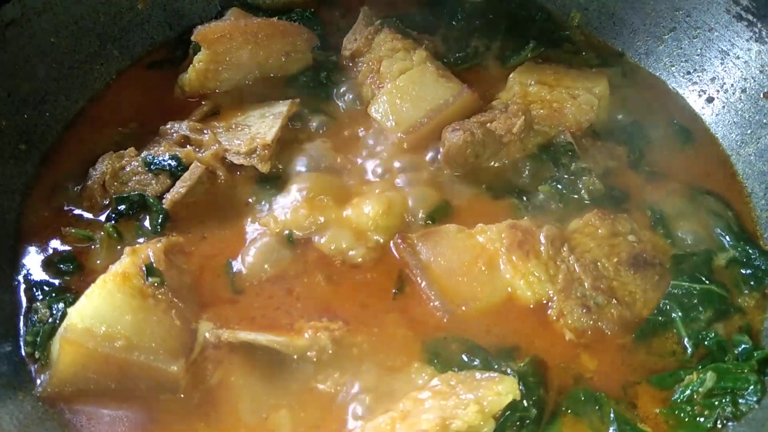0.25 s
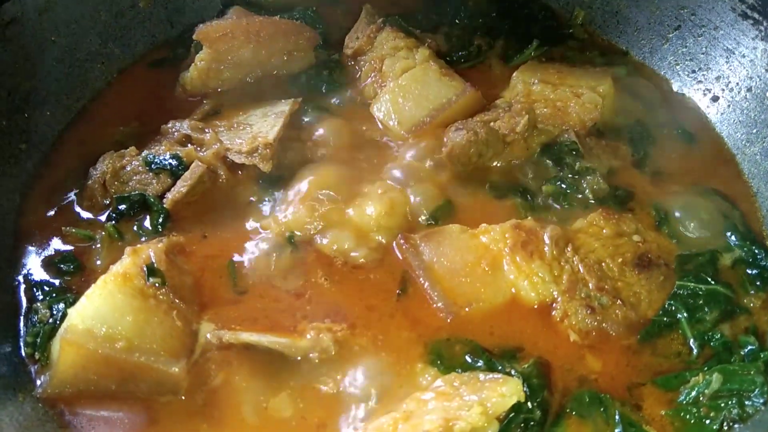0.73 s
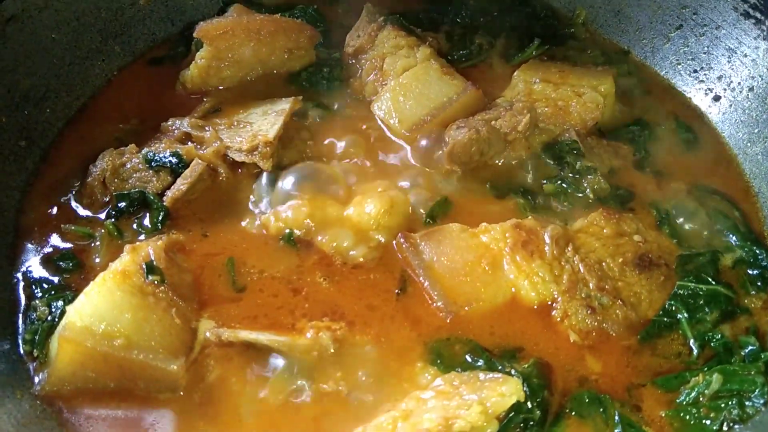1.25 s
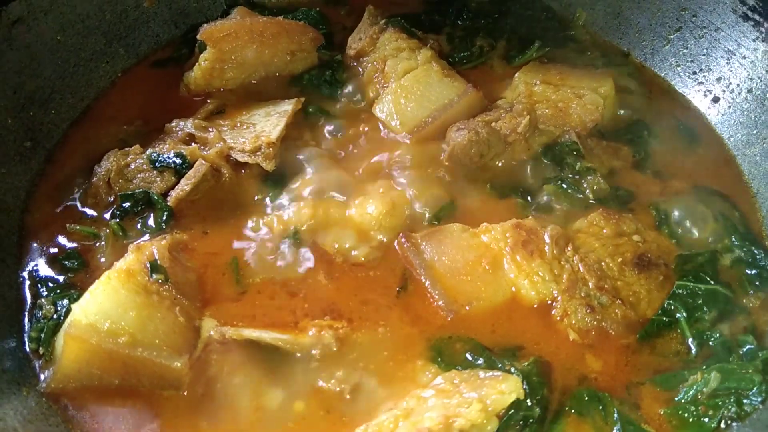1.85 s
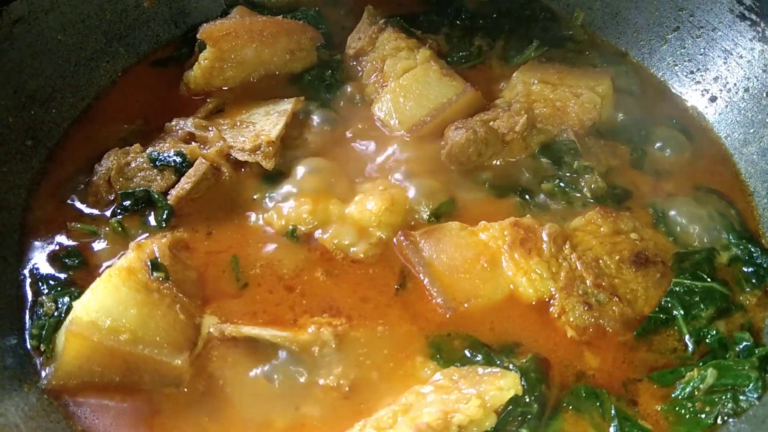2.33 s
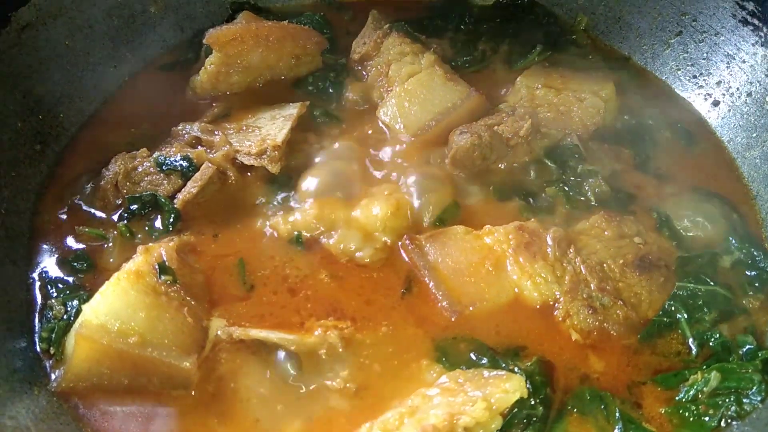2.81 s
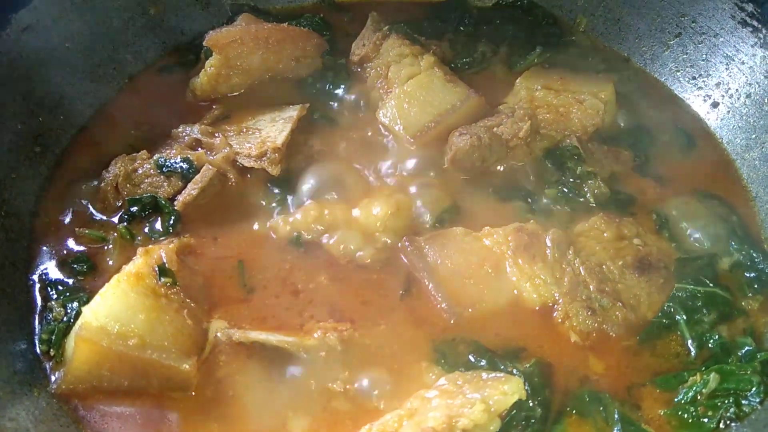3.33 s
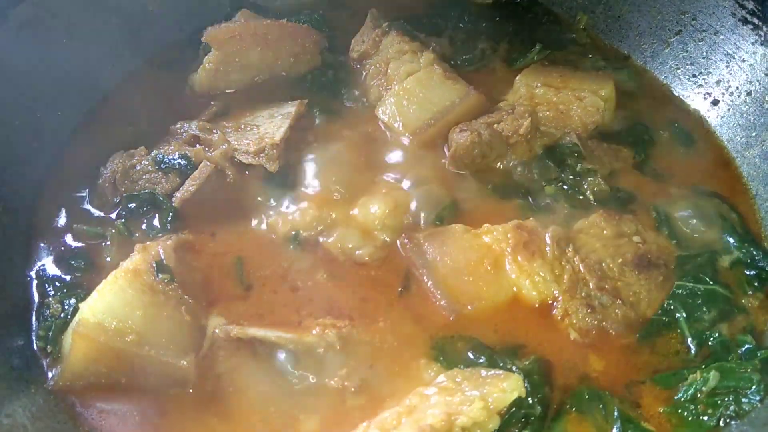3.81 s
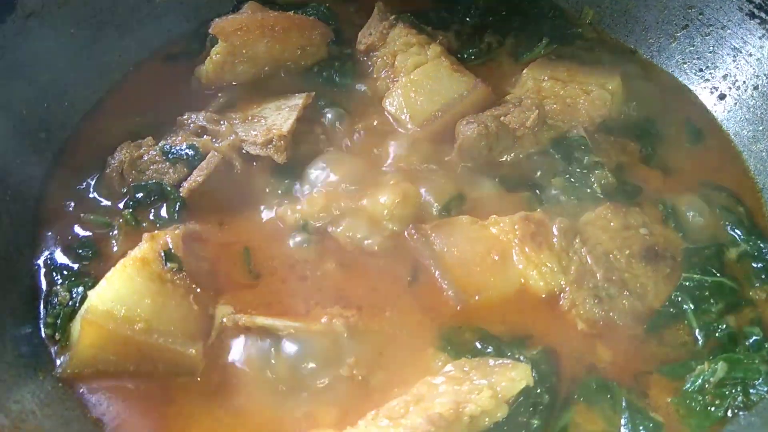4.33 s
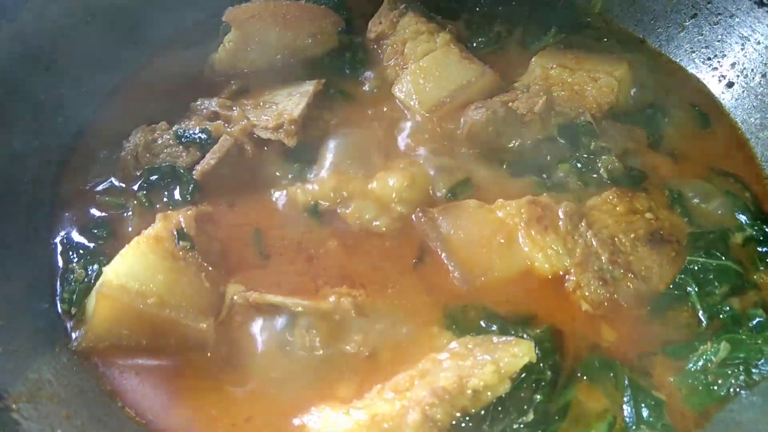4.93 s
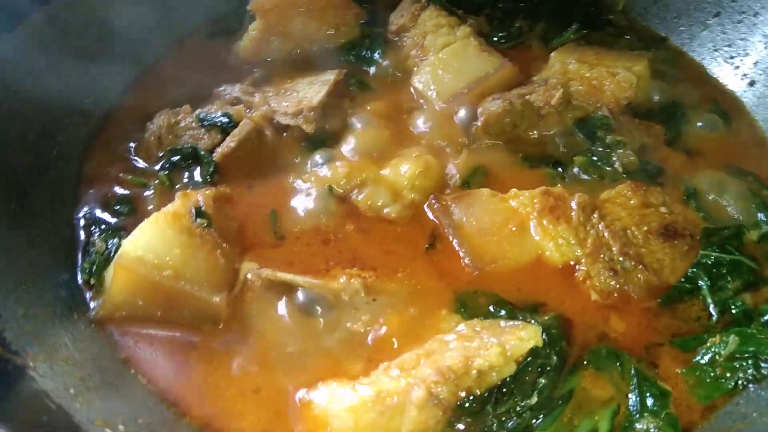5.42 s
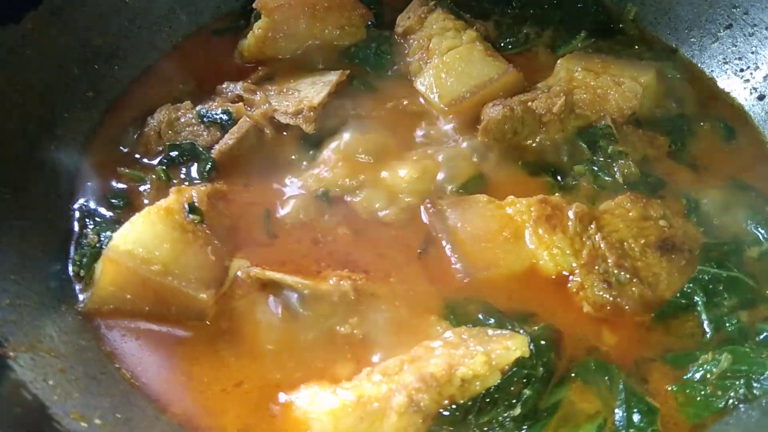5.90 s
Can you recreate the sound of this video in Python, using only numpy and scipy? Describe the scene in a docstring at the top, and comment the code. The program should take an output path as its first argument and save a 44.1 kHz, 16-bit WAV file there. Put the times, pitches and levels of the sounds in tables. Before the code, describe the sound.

A thick curry boils for about six seconds in a steel wok, heard close above it in a small kitchen. It starts already bubbling, with crisp fat snaps and a soft low thump near 0.1 s. Short, wet, rising plops come irregularly over gurgle, froth and fine fizz. Sizzle swells around 1.2 s with a hoarse puff of steam; bright bubbles stand out near 2.0 and 3.0 s, and thin steam wheezes slide by between 2.3 and 3.4 s. Fat spits thicken from 3.4 s, dull thuds stir at 3.6-3.8 s, and the sharpest snap lands near 4.15 s. The bed thins around 4.9 s, though bright spits cut through at 4.95 and 5.3 s. Bubbles crowd again near 5.5 s, with another thud, and wheezes, pops and a low thump close it around 6 s. The metal rings briefly; faint air noise, thin hiss and hum persist.

```python
"""Curry boiling in a wok

A thick curry boils in a steel wok, heard from just above it in a small kitchen. Bubbles burst with short
plops made of damped, rising sines; fat spits in sharp, high rings with wide-band clicks. Crowds of small
rings make the gurgle, froth and sizzle of the boil. Steam wheezes between the pieces of meat as a sliding
whistle in filtered noise, and now and then a big pocket of steam thuds as two low rings.
The wok and the walls ring on a little over fizz, a thin hiss, air noise and a faint mains hum."""
import sys
import numpy as np
from scipy import signal
from scipy.fft import rfft, irfft
from scipy.io import wavfile
from scipy.ndimage import uniform_filter1d

SR = 44100
rng = np.random.default_rng(int(sys.argv[2]) if len(sys.argv) > 2 else 0)


def dump_mix(stems):
    """Bounce the given channels to the path in sys.argv[1] as a 16-bit WAV at rate SR."""
    frames = np.atleast_2d(stems).T  # one column per channel
    limited = np.clip(frames, -1, 1)  # hard clip at full scale
    pcm = np.round(limited * 32767).astype(np.int16)
    wavfile.write(sys.argv[1], SR, pcm)


N = 271656  # length in samples, about 6.2 s


def undb(db):
    """Decibels to gain."""
    return 10 ** (np.asarray(db) / 20)


def unit(x):
    """Scale to an rms of 1."""
    return x / np.sqrt(np.mean(x ** 2))


def colour_db(points, hz):
    """Read a spectrum on a log-frequency axis."""
    f, db = np.transpose(points)
    return np.interp(np.log(hz + 1), np.log(f), db)


def coloured_noise(points):
    """Steady noise shaped to a spectrum; rms 1."""
    hz = np.arange(N // 2 + 1) * SR / N
    spectrum = rfft(rng.standard_normal(N)) * undb(colour_db(points, hz))
    return unit(irfft(spectrum, N))


def add(out, start_s, sound):
    """Mix a short sound in at its time."""
    i = max(int(start_s * SR), 0)
    part = sound[:max(len(out) - i, 0)]
    out[i:i + len(part)] += part


def ring(hz, decay_s, rise_s, glide):
    """One cavity opens, rings and dies, its pitch rising by the glide as the hole widens; envelope peak 1."""
    t = np.arange(int((6.5 * decay_s + rise_s) * SR) + 4) / SR
    envelope = (1 - np.exp(-(t / rise_s) ** 2)) * np.exp(-t / decay_s)
    pitch = hz * (1 + glide * (np.tanh(t / decay_s / 2) - .5))
    cycles = np.cumsum(pitch) / SR + rng.random()
    return envelope / envelope.max() * np.sin(2 * np.pi * cycles)


def spatter(hz, per_s, length_s, spread_db, scatter):
    """Smaller offspring of a burst ring near the pitch of their parent, thinning out with time; energy 1."""
    out = np.zeros(SR // 4)
    for late, strength, size in rng.random((int(per_s * length_s) + 2, 3)):
        delay = -length_s * np.log(1 - .95 * late)
        pitch = hz * (1 + scatter * (2 * size - 1))
        db = -spread_db * np.log(strength + 0.011) - 6 * late
        add(out, delay, undb(db) * ring(pitch, decay_s=7 / pitch, rise_s=3.5 / pitch, glide=0.06))
    return out / np.linalg.norm(out)


def bowl(sound, length_s, echo_db):
    """Dense early echoes between curved wall and food blur a sound and give each spot its own colour."""
    t = np.arange(int(5 * length_s * SR)) / SR
    echoes = rng.standard_normal(len(t)) * np.exp(-t / length_s)
    echoes /= np.linalg.norm(echoes)
    return sound + undb(echo_db) * signal.fftconvolve(sound, echoes)[:len(sound)]


# A cavity's ring dies at a base rate plus a viscous rate that grows steeply with pitch (given at 1 kHz).
DAMPING_PER_S, VISCOUS_PER_S = 105, 75.3
# Wet cluster after a burst, relative to the bubble's tabled level, for a pitch of 1 kHz.
CLUSTER_DB, CLUSTER_DB_PER_OCTAVE = 4, 2.5
# The biggest bursting bubbles.
# Each row: time in seconds, level in dB before trim, middle pitch of the ring in Hz.
BIG_BUBBLES = [(0.012, -40, 1514), (0.086, -35, 1739), (0.091, -48, 710), (0.121, -33.5, 1880),
               (0.243, -34, 1728), (0.315, -44, 1111), (0.499, -50, 802), (0.523, -47, 462),
               (0.58, -30, 2076), (0.592, -40.5, 1203), (0.795, -28.5, 2060), (0.878, -48.5, 909),
               (0.942, -48.5, 906), (1.234, -37.5, 1272), (1.233, -35.5, 2010), (1.366, -45, 1127),
               (1.512, -40, 1117), (1.571, -32, 2164), (1.668, -35, 1267), (1.674, -55, 297),
               (1.826, -44.5, 1193), (1.888, -48, 710), (1.986, -24, 2150), (2.012, -31.5, 2220),
               (2.085, -51, 690), (2.207, -32.5, 2204), (2.257, -56.5, 468), (2.276, -48.5, 927),
               (2.347, -48, 960), (2.383, -48, 720), (2.418, -33.5, 2560), (2.777, -47.5, 733),
               (2.807, -50, 384), (2.98, -34.5, 1440), (3.038, -23.5, 2164), (3.088, -28.5, 1896),
               (3.095, -53, 275), (3.334, -47, 954), (3.39, -27.5, 2096), (3.467, -31.5, 1537),
               (3.6, -49.5, 932), (3.655, -54.5, 638), (3.707, -54, 314), (3.743, -40.5, 1156),
               (4.035, -43.5, 1063), (4.037, -47.5, 710), (4.041, -52.5, 296), (4.053, -31, 1510),
               (4.157, -55.5, 438), (4.183, -44.5, 1123), (4.217, -40.5, 1160), (4.445, -43, 1123),
               (4.549, -35.5, 1031), (4.741, -50.5, 833), (4.675, -41.5, 2020), (4.98, -34.5, 1910),
               (5.05, -38.5, 1708), (5.275, -42, 1060), (5.419, -39.5, 1285), (5.457, -35.5, 1370),
               (5.473, -32.5, 1940), (5.474, -37.5, 1205), (5.52, -32, 2130), (5.618, -39, 1195),
               (5.689, -44, 1130), (5.735, -44, 980), (6.009, -39, 1136), (6.087, -46.5, 709),
               (6.116, -32, 2034)]


def plops():
    """The biggest bubbles swell open and ring; the crater left behind sings on briefly, rising as it closes."""
    out = np.zeros(N)
    for s, db, hz in BIG_BUBBLES:
        khz = hz / 1000
        decay_s = 1 / (DAMPING_PER_S + VISCOUS_PER_S * khz ** 2.7)
        # big, low bubbles change shape most while they ring
        glide = 70 / hz
        plop = ring(hz, decay_s, rise_s=decay_s, glide=glide)
        add(out, s - 0.859 * decay_s, undb(db - 3.0) * plop)

        crater_s = min(3 * decay_s, .009)
        crater = ring(hz * rng.uniform(0.92, 1.1), crater_s, rise_s=crater_s, glide=glide)
        add(out, s + decay_s * rng.uniform(1, 2.5), undb(db - 15.0) * crater)

        # the torn film collapses into smaller cavities; large bubbles plop cleanly, small ones splash more
        cluster_db = db + CLUSTER_DB + CLUSTER_DB_PER_OCTAVE * np.log2(khz)
        cluster = spatter(hz, per_s=330, length_s=.022, spread_db=1.0, scatter=0.284)
        add(out, s - .003, undb(cluster_db) * cluster)
    return out


# Stirred gurgle relative to the bubble's tabled level, and its exponential time constants.
STIR_DB, STIR_BUILD_S, STIR_SETTLE_S, STIR_BELOW_HZ = -25.5, 0.037, 0.013, 1500


def stirring():
    """Gain of the gurgle that builds before each large, low bubble bursts and settles after it."""
    t = np.arange(N) / SR
    gain = np.zeros(N)
    for s, db, hz in BIG_BUBBLES:
        if hz < STIR_BELOW_HZ:
            swell = np.exp(np.minimum((t - s) / STIR_BUILD_S, (s - t) / STIR_SETTLE_S))
            gain += undb(db + STIR_DB) * swell
    return gain


LONGEST_DECAY_S = 0.0069  # upper limit of ring decay in a swarm, keeping low rings short


def swarm(per_s, colour, cycles, spread_db, glide):
    """A crowd of little cavities of random size, strength and damping, its power evened out; rms about 1."""
    out = np.zeros(N)
    lo, hi = colour[0][0], colour[-1][0]
    for when, size, strength, damping in rng.random((int(per_s * N / SR), 4)):
        hz = lo * (hi / lo) ** size
        stretch = 3 ** (2 * damping - 1)
        decay_s = min(cycles * stretch / hz, LONGEST_DECAY_S)
        db = colour_db(colour, hz) - spread_db * np.log(strength + .04)
        # a higher stretch factor goes with a lower level
        add(out, when * N / SR, undb(db) / np.sqrt(stretch) * ring(hz, decay_s, decay_s, glide))
    # divide by the level smoothed twice over a tenth of a second
    power = uniform_filter1d(out ** 2, size=SR // 10)
    power = uniform_filter1d(power, size=SR // 10)
    return out / np.sqrt(power + 1e-9)


GURGLE_DB, FROTH_DB, SIZZLE_DB = -8, -5.5, -6.5  # trim of each bed
# The bed of the boil as it swells and ebbs. Each row: time in seconds, then levels before trim of
# the gurgle of large bubbles in dB, the froth of small bubbles in dB, the sizzle of fat in dB.
BOIL_LEVELS = [(0.0, -65, -48, -58), (0.38, -59.5, -54.5, -63), (1.12, -63.5, -49.5, -61.5),
               (1.26, -55, -46.5, -52), (1.5, -64.5, -53.5, -62.5), (1.72, -61.5, -48.5, -55.5),
               (2.56, -57.5, -50, -62.5), (2.9, -61, -50, -65.5), (3.08, -56.5, -48.5, -63),
               (3.22, -65.5, -58.5, -68.5), (3.4, -64, -48.5, -51.5), (4.161, -57.5, -49.5, -63),
               (4.3, -62.5, -57.5, -61), (4.9, -74.5, -55, -69), (5.04, -67.5, -53.5, -59),
               (5.56, -58.5, -51.5, -61.5), (5.78, -60, -54.5, -54.5), (6.16, -62, -49.5, -71)]
# Colour of the large bubbles. Each row: pitch in Hz, relative level in dB.
GURGLE_COLOUR = [(220, -16.5), (330, -29), (480, -13), (620, -21.5), (780, -12), (950, -6), (1150, 3.5),
                 (1400, -5)]
# Colour of the small bubbles. Each row: pitch in Hz, relative level in dB.
FROTH_COLOUR = [(1350, -5), (1620, 11), (1830, -4.5), (2200, 13), (2500, -1.5), (2900, 2), (3600, -40)]
# Colour of the hot fat. Each row: pitch in Hz, relative level in dB.
SIZZLE_COLOUR = [(3600, -19.5), (4300, -3.5), (4850, -4), (5400, -7), (6300, -6.5), (7250, 5), (8300, 1.5),
                 (9300, -9), (11500, -28.5), (15500, -14)]


def simmer():
    """Gurgle, froth and sizzle swell and ebb with the boil; they come from all over the wok."""
    s, *columns = np.transpose(BOIL_LEVELS)
    gurgle_db, froth_db, sizzle_db = (np.interp(np.arange(N) / SR, s, c) for c in columns)
    gurgle = swarm(per_s=260, colour=GURGLE_COLOUR, cycles=6.05, spread_db=5.5, glide=0.049)
    froth = swarm(per_s=580, colour=FROTH_COLOUR, cycles=8.9, spread_db=6.0, glide=0.022)
    sizzle = swarm(per_s=520, colour=SIZZLE_COLOUR, cycles=5.9, spread_db=8.5, glide=0)
    bubbling = gurgle * (undb(gurgle_db + GURGLE_DB) + stirring())
    bubbling += froth * undb(froth_db + FROTH_DB)
    frying = bowl(sizzle, length_s=0.0025, echo_db=2.5) * undb(sizzle_db + SIZZLE_DB)
    return bowl(bubbling, length_s=0.0051, echo_db=-8.5) + frying


def glance(sound, lag_s, echo_db):
    """One close reflection off gravy or meat cuts notches into a sound, in other places for every spot."""
    lag = int(lag_s * (.5 + rng.random()) * SR) + 1
    echo = undb(echo_db) * np.pad(sound, (lag, 0))[:len(sound)]
    return (sound + echo) / np.hypot(1, undb(echo_db))


CLICK_DECAY_S = 0.00041  # decay of the noise burst before filtering


def click():
    """A very short, dry burst of noise with a wide spectrum; peak 1."""
    t = np.arange(SR // 100) / SR
    burst = rng.standard_normal(len(t)) * np.exp(-t / CLICK_DECAY_S)
    filtered = signal.lfilter(*signal.butter(2, [3000, 8500], "band", fs=SR), burst)
    return filtered / np.abs(filtered).max()


# A faint ring and a fainter wide-band click lead each spit: levels relative to its tabled level,
# lead in seconds ahead of its tabled time.
LEAD_RING_DB, LEAD_CLICK_DB, LEAD_S = -17.5, -28.5, 0.0034
# The loudest spits of fat.
# Each row: time in seconds, level in dB before trim, pitch in Hz, level of the spatter in dB before trim.
FAT_SPITS = [(0.012, -30.5, 7630, -66), (0.023, -43, 3800, -49), (0.0754, -36, 7080, -47),
             (0.0946, -25.5, 7900, -69), (0.1239, -25.5, 7630, -65), (0.1664, -30, 7700, -59),
             (0.2128, -40, 5500, -59.5), (0.312, -34.5, 5850, -63), (0.468, -32.5, 7050, -52.5),
             (0.511, -51, 4160, -56), (0.53, -28, 7300, -69), (0.66, -43, 7240, -54),
             (0.8122, -39.5, 4860, -57), (0.839, -29.5, 7400, -69), (0.9365, -47, 4510, -51.5),
             (1.157, -25, 7200, -47), (1.1839, -28.5, 7500, -46), (1.2762, -31, 8045, -61.5),
             (1.2985, -34.5, 9130, -45), (1.3358, -37.5, 8900, -50), (1.341, -39, 4250, -62),
             (1.6246, -36.5, 4730, -62), (1.668, -31.5, 7100, -44), (1.688, -32, 6140, -50),
             (1.7255, -35, 4430, -49.5), (1.7842, -32, 7550, -54), (1.8253, -28.5, 7500, -70),
             (1.8438, -32.5, 5020, -70.5), (1.8854, -30, 6970, -68), (2.0146, -30, 7220, -71),
             (2.1032, -33, 7860, -45.5), (2.1408, -31, 8340, -46), (2.202, -30, 7900, -74),
             (2.265, -34.5, 6400, -58), (2.64, -37, 7770, -49), (2.7933, -31, 8102, -38),
             (2.8612, -26, 6930, -44.5), (2.9188, -31.5, 5330, -45.5), (3.0397, -41, 4550, -62.5),
             (3.224, -38.5, 5920, -50), (3.268, -37, 5140, -53), (3.336, -46, 4700, -49.5),
             (3.37, -31, 6600, -49), (3.455, -31, 6900, -48), (3.461, -26, 8730, -45),
             (3.5104, -35, 8630, -50), (3.557, -45, 5140, -52), (3.614, -37, 4770, -50.5),
             (3.6496, -25, 7230, -62), (3.697, -26.5, 7150, -73), (3.737, -30.5, 7170, -72),
             (3.7757, -29, 6900, -65), (3.806, -25.5, 7800, -57), (3.8414, -34, 4140, -52),
             (3.8594, -29, 8050, -72), (3.8904, -32.5, 7830, -69), (3.961, -33, 7780, -61),
             (4.047, -42.5, 4500, -54), (4.084, -29.5, 7080, -51), (4.1571, -19.5, 7250, -41.5),
             (4.17, -21.5, 7640, -59), (4.215, -31, 7750, -68), (4.254, -33.5, 8930, -45.5),
             (4.4786, -35.5, 5000, -64), (4.5333, -32, 6990, -42.5), (4.553, -38.5, 4760, -52),
             (4.568, -36, 8360, -58), (4.651, -43, 6830, -45), (4.714, -40, 8120, -45.5),
             (4.8093, -39, 5090, -68), (4.9343, -27.5, 7920, -72), (4.9592, -28, 6940, -55),
             (4.9632, -22, 7780, -52), (4.9755, -33, 7560, -46), (5.0704, -34.5, 7100, -71),
             (5.1003, -40.5, 4460, -59), (5.1164, -33, 8080, -45), (5.1444, -33.5, 7400, -53.5),
             (5.285, -24, 7300, -42), (5.296, -27.5, 8180, -52.5), (5.315, -29, 7900, -56),
             (5.3305, -29.5, 7460, -65), (5.344, -30.5, 7830, -70), (5.6652, -29.5, 8500, -57),
             (5.735, -37.5, 4750, -60), (5.7532, -34, 4840, -62), (5.7831, -30.5, 5670, -41.5),
             (5.8282, -36, 6260, -59), (5.8457, -31.5, 8400, -51), (5.9224, -36, 8440, -49),
             (5.9839, -25, 9000, -55), (5.995, -27.5, 8700, -48.5)]


def spits(top_hz):
    """A droplet snaps in about a millisecond, after a faint ring and click, and throws a little spatter."""
    out, clicks = np.zeros(N), np.zeros(N)
    for s, db, hz, spatter_db in FAT_SPITS:
        spray = spatter(hz, per_s=300, length_s=.026, spread_db=7.5, scatter=0.19)
        spray = bowl(spray, length_s=0.0052, echo_db=-10.5)
        burst = undb(spatter_db + 25.5) * glance(spray, lag_s=.0009, echo_db=0.5)
        # small droplets die much faster than larger ones
        decay_s = 0.00029 * (7500 / hz) ** 2
        add(burst, .0025, undb(db - .5) * ring(hz, decay_s, rise_s=.001, glide=0))
        add(out, s - .003, bowl(burst, length_s=0.0043, echo_db=-8.0))

        lead_ring = ring(hz * rng.uniform(0.813, 1.13), decay_s, rise_s=0.00072, glide=0)
        add(out, s - LEAD_S, undb(db + LEAD_RING_DB) * lead_ring)
        add(clicks, s - LEAD_S, undb(db + LEAD_CLICK_DB) * click())
    # a steep low-pass takes off the highest treble of the rings and spatter
    rounded = signal.sosfilt(signal.butter(10, top_hz, fs=SR, output="sos"), out)
    return clicks + rounded


RUSH_DB = -12.5  # rush of steam against its whistle
# The wet lip of a steam gap flaps and splits the whistle into bands.
FLAP_HZ, FLAP_DEPTH = 190.4, 0.46  # mean rate, modulation depth
# Steam squeezed through wet gaps. Each row: start in seconds, length in seconds, first pitch in Hz,
# last pitch in Hz, width in Hz that scales the waver, level in dB before trim and fades.
STEAM_GAPS = [(1.165, 0.14, 2850, 2670, 466, -49.5), (2.259, 0.24, 2885, 3063, 93.5, -48),
              (2.583, 0.16, 3510, 3160, 320, -50), (2.903, 0.21, 2856, 2954, 109, -51),
              (3.234, 0.16, 3134, 3225, 358, -48), (4.337, .13, 3820, 3890, 40, -63),
              (5.453, 0.082, 2720, 2530, 130, -59), (5.462, .13, 3830, 3890, 110, -57.5),
              (5.799, 0.11, 3500, 3410, 172, -49), (5.946, 0.11, 2616, 2695, 71, -54),
              (6.005, .12, 3240, 3510, 110, -53.5), (6.043, 0.11, 3970, 3938, 200, -56)]


def wheezes():
    """A hoarse whistle slides as the gap changes, wavers, and sputters as gravy crosses it, in rushing steam."""
    out = np.zeros(N)
    for s, length, first_hz, last_hz, width_hz, db in STEAM_GAPS:
        u = np.linspace(0, 1, int(length * SR))
        noise = rng.standard_normal((2, SR // 2))
        slow = signal.lfilter(*signal.butter(2, 70, fs=SR), noise)
        waver, sputter = (unit(v[-len(u):]) for v in slow)

        pitch = first_hz + (last_hz - first_hz) * np.sqrt(u) + 0.22 * width_hz * waver
        flap_cycles = np.cumsum(FLAP_HZ * (1 + 0.11 * sputter)) / SR
        flap = 1 + FLAP_DEPTH * np.sin(2 * np.pi * flap_cycles)
        whistle = unit(flap * np.sin(2 * np.pi * np.cumsum(pitch) / SR))

        # the rush lies in a band below the first pitch
        band = signal.butter(2, [0.863 * first_hz, 0.91 * first_hz], "band", fs=SR)
        rush = unit(signal.lfilter(*band, rng.standard_normal(len(u))))
        steam = unit(undb(3.7 * sputter) * (whistle + undb(RUSH_DB) * rush))
        add(out, s, undb(db - 4.5) * steam * np.sin(np.pi * u))
    return out


# Steam pockets heaving under the gravy.
# Each row: time in seconds, level in dB before trim, middle pitch of the lower ring in Hz.
STEAM_POCKETS = [(0.093, -50.5, 107.6), (0.133, -56, 86), (3.622, -53.5, 119.7), (3.703, -45.5, 99),
                 (3.754, -51.5, 105.4), (5.548, -49.5, 94.5), (6.002, -50.5, 100.5)]


def thuds():
    """Large steam pockets lift the gravy and collapse with a dull thump of two short rings."""
    out = np.zeros(N)
    for s, db, hz in STEAM_POCKETS:
        add(out, s - .004, undb(db - 5.0) * ring(hz, decay_s=0.025, rise_s=0.0046, glide=0.032))
        add(out, s, undb(db - 11.0) * ring(2.27 * hz, decay_s=0.0055, rise_s=0.0031, glide=0.34))
    return out


def pinpricks(per_s, spread_db, db):
    """Tiny films split all over the surface in faint, wide-band clicks."""
    out = np.zeros(N)
    for when, strength in rng.random((int(per_s * N / SR), 2)):
        click_db = db - spread_db * np.log(strength + 0.037)
        add(out, when * N / SR, undb(click_db) * click())
    return out


# Colour of the finest fizz. Each row: frequency in Hz, relative density in dB per Hz.
FIZZ_COLOUR = [(300, -6), (800, 1), (2400, 22.5), (3600, -8), (4600, -9), (8300, -9), (9700, -19),
               (11000, -43.5), (16000, -45)]


def fizz(db, flicker_db, follow):
    """Bubbles too small to hear singly merge into a soft, flickering hiss that follows the froth."""
    hiss = coloured_noise(FIZZ_COLOUR)
    s, _, froth_db, _ = np.transpose(BOIL_LEVELS)
    swell_db = follow * np.interp(np.arange(N) / SR, s, froth_db - froth_db.mean())
    flicker = unit(signal.lfilter(*signal.butter(2, 60, fs=SR), rng.standard_normal(N)))
    return hiss * undb(db + swell_db + flicker_db * flicker)


def singing(hz, width_hz, db):
    """Countless tiny bubbles on the hot steel keep up a thin, narrow hiss: noise through one resonance."""
    resonance = signal.iirpeak(hz, hz / width_hz, fs=SR)
    return undb(db) * unit(signal.lfilter(*resonance, rng.standard_normal(N)))


# Ringing modes of the wok with its contents.
# Each row: frequency in Hz, time to fall by 60 dB in seconds, relative level in dB.
WOK_MODES = [(935, 0.091, 3.5), (1118, 0.37, -2), (1180, 0.27, -6), (1623, 0.089, -3.5), (2190, 0.12, -7.5),
             (4273, 0.1, 9), (4785, 0.075, 13.5), (6075, 0.072, 12.5), (7330, 0.021, 14), (8310, 0.047, 13)]


def surroundings(x, t60_s, room_db, wok_db, echo_s, echo_db):
    """The wok rings along, the nearest wall answers and the kitchen adds a short tail."""
    t = np.arange(SR // 2) / SR
    tail = rng.standard_normal(len(t)) * 1000 ** (-t / t60_s)
    wok = sum(undb(db) * np.cos(2 * np.pi * hz * t) * 1000 ** (-t / t60) for hz, t60, db in WOK_MODES)
    response = undb(room_db) * tail / np.linalg.norm(tail)
    response += undb(wok_db) * wok / np.linalg.norm(wok)
    response[int(echo_s * SR)] += undb(echo_db)
    return x + signal.fftconvolve(x, response)[:N]


AIR_DB, HUM_HZ, HUM_DB = -73.5, 102, -82  # rms levels
# Colour of the room's air noise. Each row: frequency in Hz, relative density in dB per Hz.
AIR_COLOUR = [(25, -28), (50, -3.5), (75, 2), (150, -0.5), (500, 0.5), (1500, -23), (4000, -26),
              (9000, -19), (12000, -36)]


def kitchen():
    """Steady air noise of the stove and the room, with a mains hum as one sine."""
    air = coloured_noise(AIR_COLOUR)
    hum = np.sin(2 * np.pi * HUM_HZ * np.arange(N) / SR)
    return undb(AIR_DB) * air + undb(HUM_DB) * unit(hum)


def scene():
    """The boiling wok in its kitchen."""
    pot = plops() + simmer() + spits(top_hz=10700) + wheezes()
    pot += pinpricks(per_s=80, spread_db=5.5, db=-65.5) + fizz(db=-72.0, flicker_db=4.0, follow=1.0)
    heard = surroundings(pot, t60_s=0.21, room_db=-6.0, wok_db=-13.5, echo_s=0.01, echo_db=-14.0)
    # the thuds and the thin hiss come without wok ring or room
    return (heard + thuds() + singing(hz=4840, width_hz=30, db=-71.5) + kitchen())[None]


LOW_CUT_HZ, TOP_HZ = 30, 15800


def record(dry):
    """The small microphone loses the deepest bass and the recorder cuts the top."""
    thin = signal.sosfilt(signal.butter(2, LOW_CUT_HZ, "high", fs=SR, output="sos"), dry)
    return signal.sosfilt(signal.ellip(8, .2, 70, TOP_HZ, fs=SR, output="sos"), thin)


dry = scene()
out = record(dry)
dump_mix(out)
```